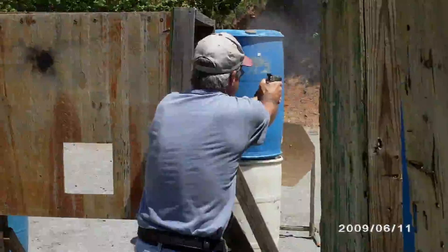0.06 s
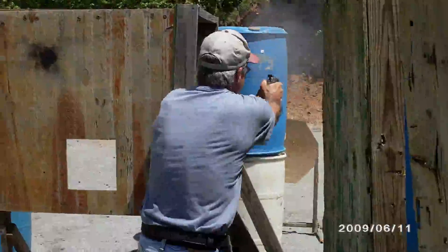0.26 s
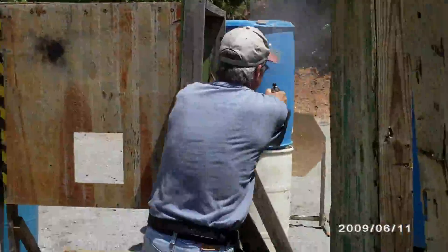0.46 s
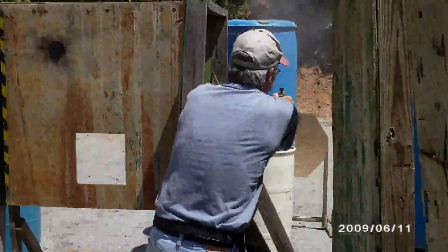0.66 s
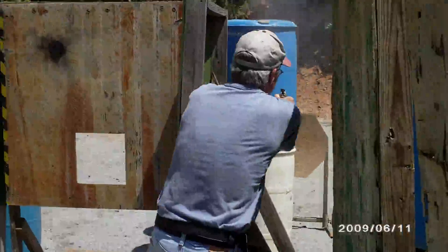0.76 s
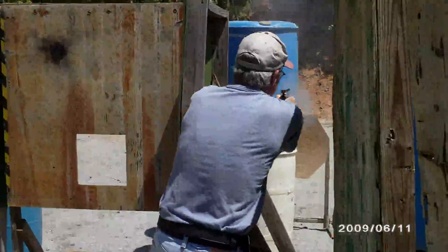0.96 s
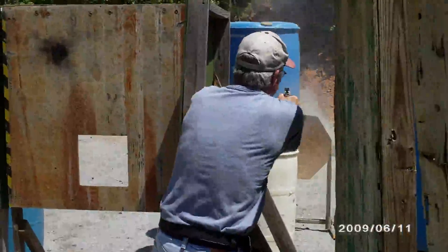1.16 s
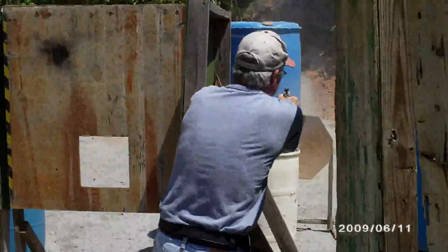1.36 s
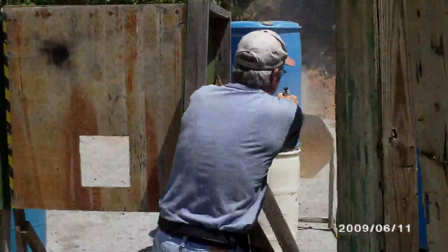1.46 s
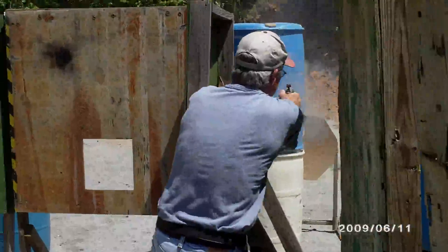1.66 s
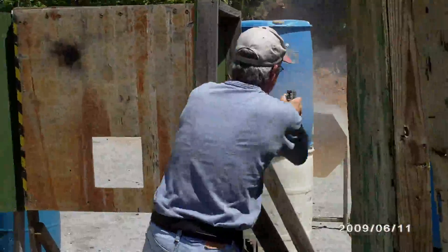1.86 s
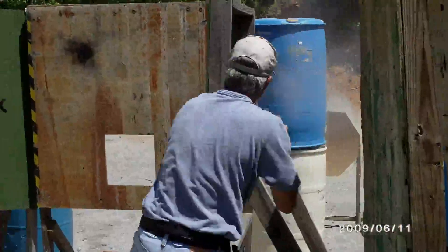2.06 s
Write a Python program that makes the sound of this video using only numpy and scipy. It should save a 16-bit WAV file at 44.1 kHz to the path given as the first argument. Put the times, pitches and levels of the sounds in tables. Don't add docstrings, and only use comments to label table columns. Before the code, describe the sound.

Pistol shots at an outdoor range, heard close on a small overloading mono microphone. An earlier shot's echo fades at the start. Sharp, clipped bangs come at about 0.2, 1.07 and 1.7 seconds, each with dense slapping reflections, a faint hollow drum hum and a thinning distant tail. A soft wind puff at 0.8 and tiny case ticks on gravel from 0.93 to 1.05 are barely audible.

```python
import sys
import numpy as np
from scipy import signal
from scipy.fft import rfft, irfft, next_fast_len
from scipy.io import wavfile
from scipy.ndimage import uniform_filter1d

SR = 44100
rng = np.random.default_rng(int(sys.argv[2]) if len(sys.argv) > 2 else 0)


def linear_from_db(decibels):
    return 10 ** (np.asarray(decibels, float) / 20)


def unload_audio(sound):
    columns = np.transpose(np.atleast_2d(sound))
    steps = np.round(np.clip(columns, -1, 1) * 32767)
    wavfile.write(sys.argv[1], SR, steps.astype(np.int16))


N = 92610

# frequency in Hz, level in dB per Hz.
BANKS_COLOUR = [(24, -55), (40, -28), (211, -7), (392, -16), (514, -8.5), (888, -14), (1350, -7),
                (3740, -5.5), (15000, -20.5)]


def at_hz(points, hz):
    table_hz, value = np.array(points).T
    return np.interp(np.log(hz), np.log(table_hz), value)


def third_octaves(spectrum, white):
    centre_hz = 25 * 2 ** (np.arange(29) / 3)
    bin_hz = np.maximum(np.arange(len(white) // 2 + 1) * SR / len(white), 20)
    coloured = rfft(white) * linear_from_db(at_hz(spectrum, bin_hz))
    octaves_off = np.abs(np.log2(bin_hz / centre_hz[:, None]))
    bands = irfft(coloured * np.maximum(1 - 3 * octaves_off, 0), len(white))
    return centre_hz, bands / bands.sum(axis=0).std()


def coloured_noise(spectrum):
    return third_octaves(spectrum, rng.standard_normal(N))[1].sum(axis=0)


def still_air():
    # frequency in Hz, level in dB per Hz.
    air_colour = [(25, -3), (150, -17), (240, -9.5), (1000, -18), (1400, -20.5), (5000, -50), (10500, -44),
                  (14000, -77.5)]
    return linear_from_db(-58.5) * coloured_noise(air_colour)


def drums(white):
    # frequency in Hz, width in Hz, level in dB.
    drum_modes = [(530, 20, -38), (845, 20, -44), (495, 20, -45)]
    peak_s, sharpness = 0.27, 9.0
    u = np.arange(len(white)) / SR / peak_s
    total = 0
    for hz, width_hz, db in drum_modes:
        hum = signal.lfilter(*signal.iirpeak(hz, hz / width_hz, SR), white)
        total = total + linear_from_db(db) * hum / hum.std()
    return total * (u * np.exp(1 - u)) ** sharpness


def echoes(white):
    # frequency in Hz, level in dB per Hz.
    bay_colour = [(40, -23), (90, -19.5), (250, 0.5), (900, 3.7), (1400, -6), (1800, -10.5), (4000, -15.5),
                  (14000, -29.5)]
    trees_colour = [(60, -14.5), (190, -18.5), (500, -7), (1300, -5), (1650, -12), (4000, -9.5),
                    (7500, -18), (14500, -71)]
    # frequency in Hz, time to fall 60 dB in seconds.
    bay_t60_s = [(60, 0.27), (300, 0.13), (1000, .16), (4000, 0.21), (12000, 0.28)]
    banks_t60_s = [(100, 0.36), (500, 0.68), (2000, 0.34), (6000, 0.49), (11000, 0.5), (15000, .26)]
    trees_t60_s = [(100, 2.18), (700, 3.01), (3000, 1.67), (6500, 0.87), (13000, .5)]
    # delay in seconds, swell in dB, width in seconds.
    swells = [(.062, 5, 0.0069), (0.138, 8.5, 0.03), (.175, 1, 0.0066), (.21, 1.5, 0.015), (.245, 3, 0.029),
              (.28, 0, 0.0061), (0.319, -4, .008), (.43, 2, 0.016)]
    swell_top_hz = 2500

    t = np.arange(white.shape[-1]) / SR
    swell_db = sum(db * np.exp(-.5 * ((t - s) / width_s) ** 2) for s, db, width_s in swells)
    # colour, level in dB, decay, rise in seconds, hold in seconds.
    fields = [
        (bay_colour, 7, bay_t60_s, 0.003, 0.021),
        (BANKS_COLOUR, -9.5, banks_t60_s, 0.003, 0),
        (trees_colour, -24, trees_t60_s, 0.077, 0),
    ]
    out = 0
    for noise, (colour, db, t60_s, rise_s, hold_s) in zip(white, fields):
        hz, bands = third_octaves(colour, noise)
        gain_db = -60 * np.maximum(t - hold_s, 0) / at_hz(t60_s, hz)[:, None]
        gain_db = gain_db + swell_db / (1 + (hz[:, None] / swell_top_hz) ** 2)
        rise = 1 - np.exp(-(t / rise_s) ** 2)
        out = out + (bands * linear_from_db(db + gain_db)).sum(axis=0) * rise
    return out + drums(white[0, ::-1])


def muzzle(t, blast_db):
    crack_s, lag_s, blast_s, suck_s = 0.0015, 0.0023, 0.003, 0.0004
    crack_band = signal.butter(1, [1500, 10000], "band", fs=SR, output="sos")
    crack = signal.sosfilt(crack_band, rng.standard_normal(len(t)))
    crack = linear_from_db(-5) * crack * (t / crack_s * np.exp(1 - t / crack_s)) ** 2
    suck = linear_from_db(-1) * np.exp(-((t - lag_s + suck_s / 2) / suck_s) ** 2)
    u = np.maximum(t - lag_s, 0) / blast_s
    blast = linear_from_db(blast_db) * (u > 0) * (1 - u) * np.exp(-u)
    return crack - suck + blast


def microphone_swing(t, db):
    dip_s, dip_sharpness, back_s, back_share = 0.08, 5.0, 0.115, 0.3
    dip, back = t / dip_s, t / back_s
    overshoot = back_share * back * np.exp(1 - back)
    return linear_from_db(db) * (overshoot - (1 + back_share) * (dip * np.exp(1 - dip)) ** dip_sharpness)


def shots():
    # start in seconds, strength in dB, blast in dB, share of echoes common to all shots (0-1).
    firings = [
        (-.36, 0.85, 22, 0.66),
        (0.2066, 0.68, 12, 0.37),
        (1.0731, 0.25, 20, 0.84),
        (1.7122, 0.45, 10.5, 1),
    ]
    swings_db = [-23, -17, -23, -20]
    lead = SR // 2
    size = next_fast_len(int(1.1 * SR))
    t = np.arange(size) / SR
    out = np.zeros(lead + N + size)
    common = echoes(rng.standard_normal((3, size)))
    fade = np.clip((t[-1] - t) / 0.2, 0, 1)
    for (s, db, blast_db, share), swing_db in zip(firings, swings_db):
        own = echoes(rng.standard_normal((3, size)))
        tail = np.sqrt(share) * common + np.sqrt(1 - share) * own
        i = lead + int(s * SR)
        out[i:i + size] += fade * (linear_from_db(db) * tail + muzzle(t, blast_db) + microphone_swing(t, swing_db))
    return out[lead:lead + N]


def wind_puff():
    t = np.arange(N) / SR
    centre_s, width_s, top_hz = 0.805, 0.015, 100
    low = signal.sosfilt(signal.butter(2, top_hz, fs=SR, output="sos"), rng.standard_normal(N))
    return linear_from_db(-45) * low / low.std() * np.exp(-.5 * ((t - centre_s) / width_s) ** 2)


def spent_case():
    # start in seconds, peak in dB.
    ticks = [(.9255, -59), (.934, -63), (.948, -57), (.957, -62), (.967, -64), (.982, -66), (1.046, -66)]
    tick_hz, t60_s = 8500, 0.04
    t = np.arange(N) / SR
    band = signal.butter(2, [tick_hz / 1.4, tick_hz * 1.3], "band", fs=SR, output="sos")
    hiss = signal.sosfilt(band, rng.standard_normal(N))
    level = 0
    for s, db in ticks:
        level = level + (t >= s) * linear_from_db(db - 60 * np.maximum(t - s, 0) / t60_s)
    return hiss * level


def scene():
    return (still_air() + shots() + wind_puff() + spent_case())[None]


def top_cut(x):
    return signal.sosfilt(signal.butter(12, 15480, fs=SR, output="sos"), x)


def record(dry):
    # frequency in Hz, width in Hz, depth (0-1).
    recorder_dips = [(7830, 580, .9), (11100, 89, .6)]
    ceiling, knee = 0.965, 4.5
    x = dry / (1 + np.abs(dry / ceiling) ** knee) ** (1 / knee)
    smear = int(0.008 * SR)
    spread = uniform_filter1d(uniform_filter1d(np.abs(x), smear), smear)
    x = x + linear_from_db(-33) * spread * coloured_noise(BANKS_COLOUR)
    for hz, width_hz, depth in recorder_dips:
        x = x - depth * signal.lfilter(*signal.iirpeak(hz, hz / width_hz, SR), x)
    x = signal.sosfilt(signal.ellip(10, 0.5, 60, 15300, fs=SR, output="sos"), x)
    x = signal.lfilter(*signal.butter(1, 10500, fs=SR), x)
    return top_cut(x)


dry = scene()
out = record(dry)
unload_audio(out)
```